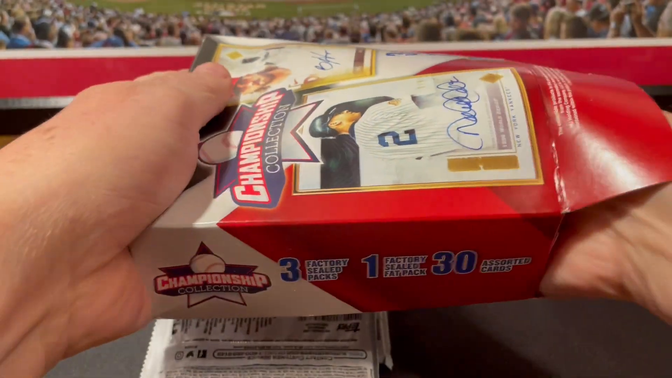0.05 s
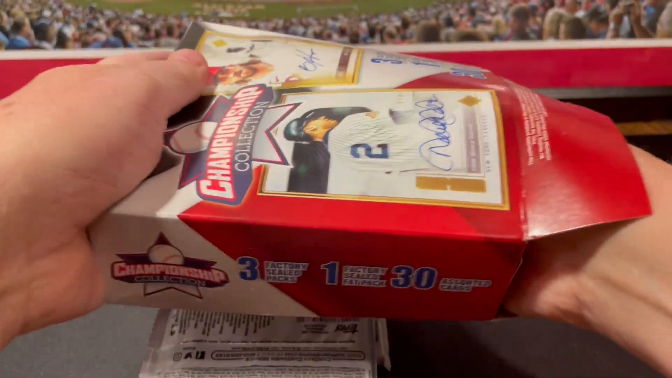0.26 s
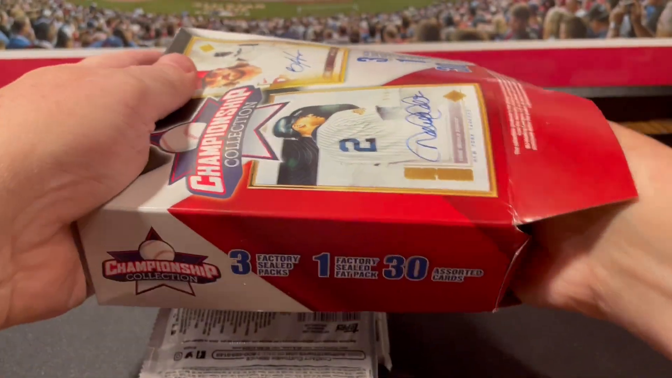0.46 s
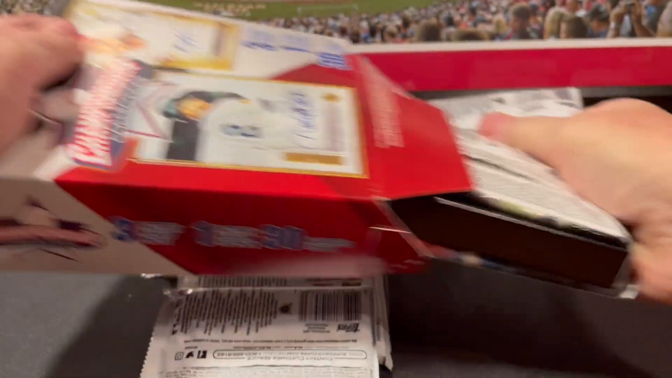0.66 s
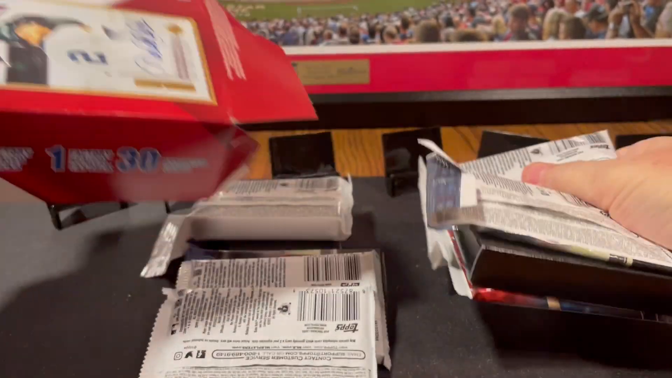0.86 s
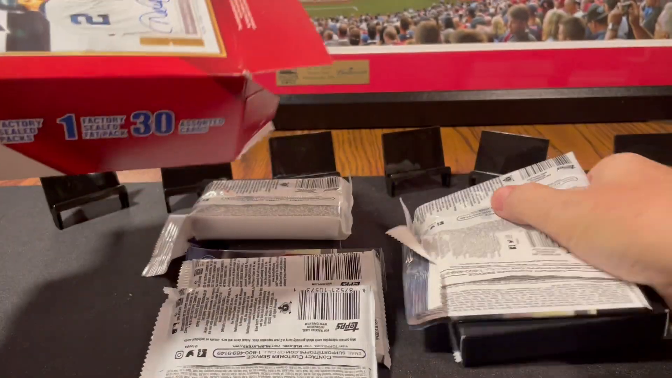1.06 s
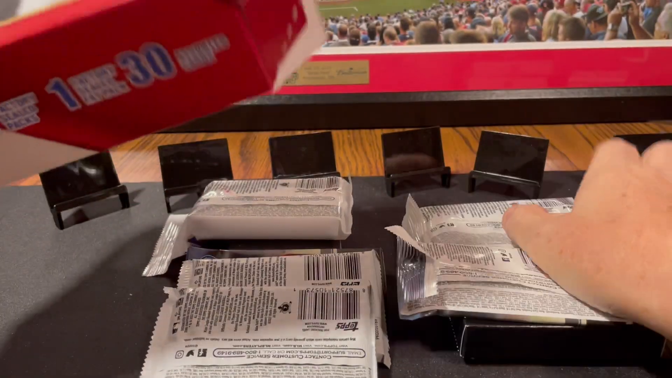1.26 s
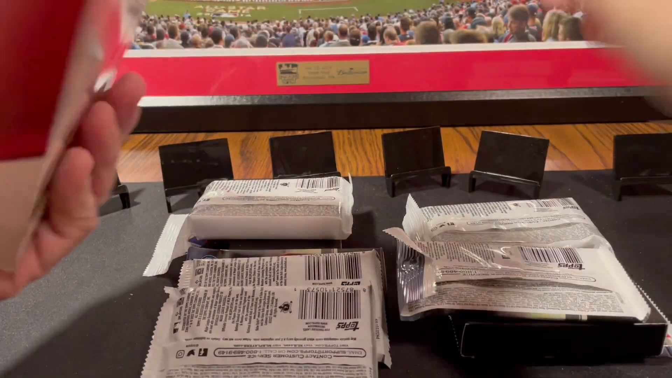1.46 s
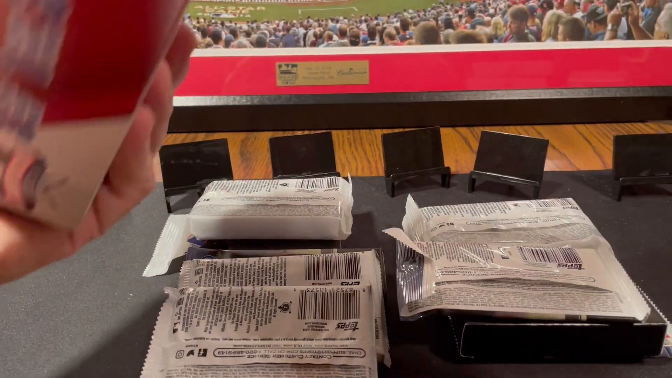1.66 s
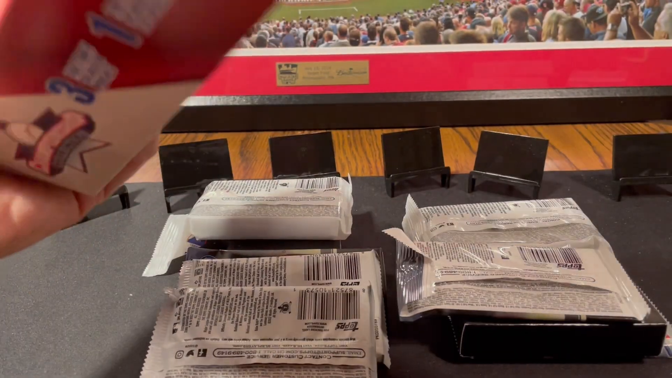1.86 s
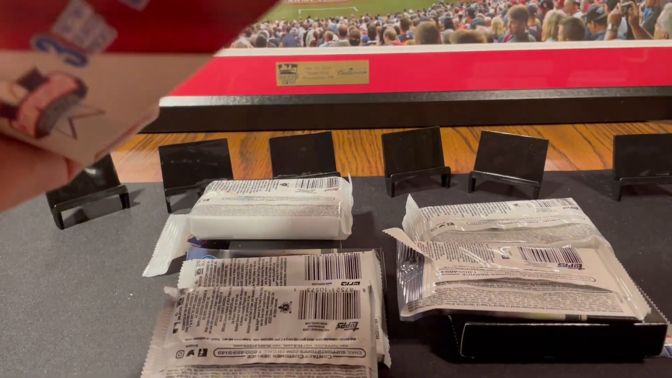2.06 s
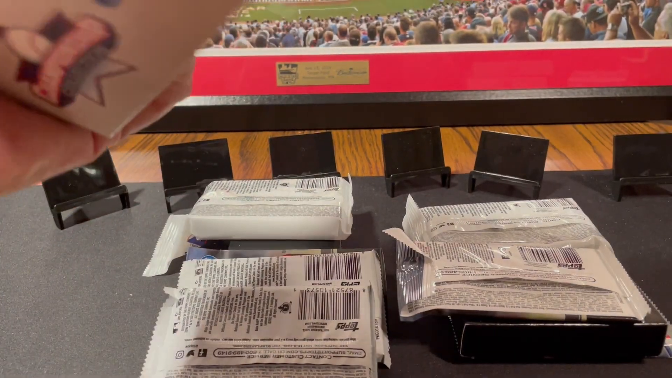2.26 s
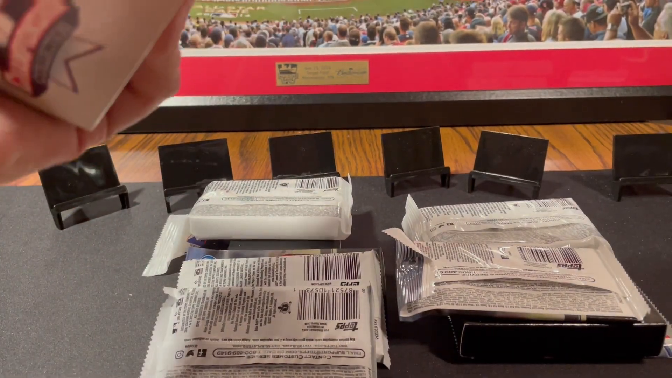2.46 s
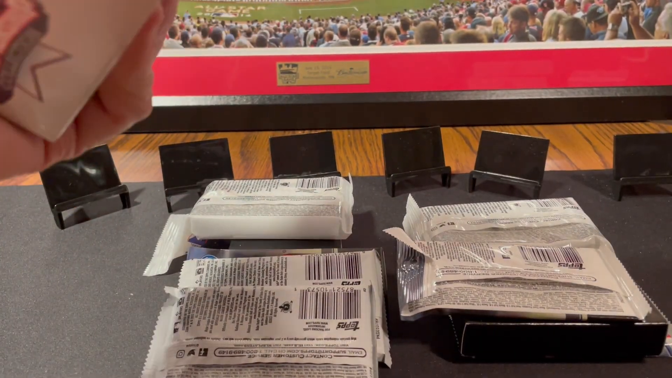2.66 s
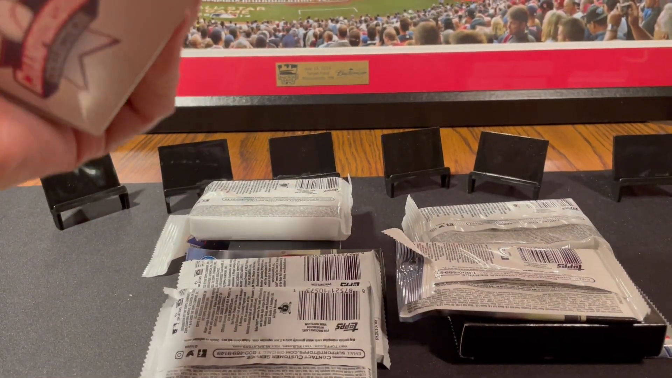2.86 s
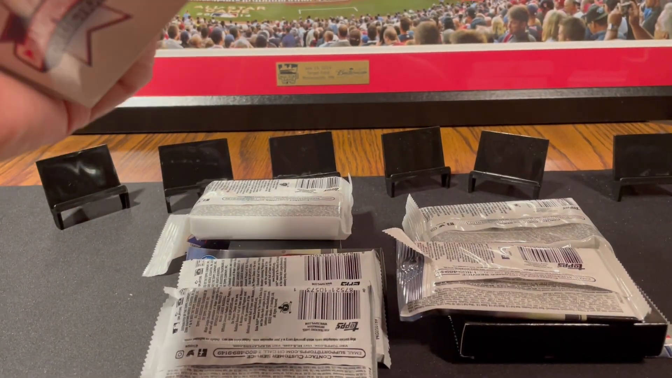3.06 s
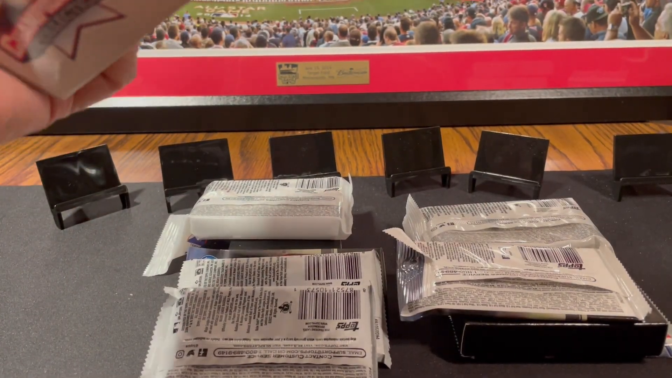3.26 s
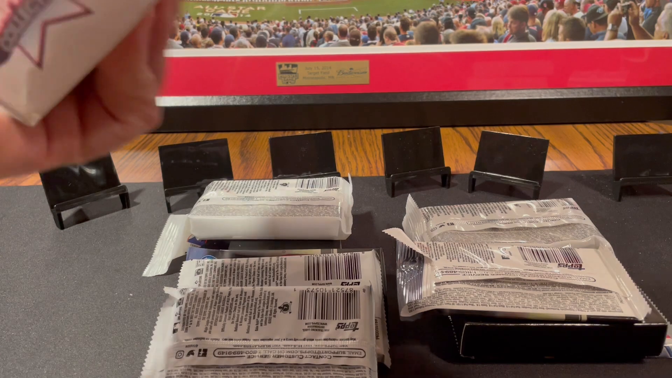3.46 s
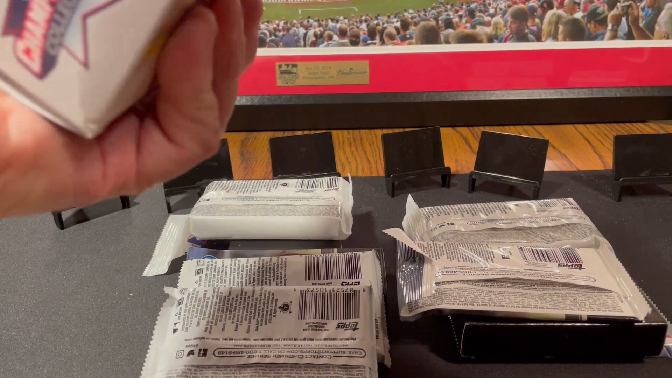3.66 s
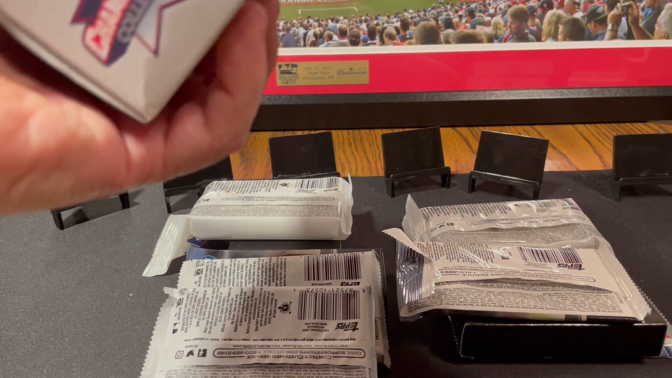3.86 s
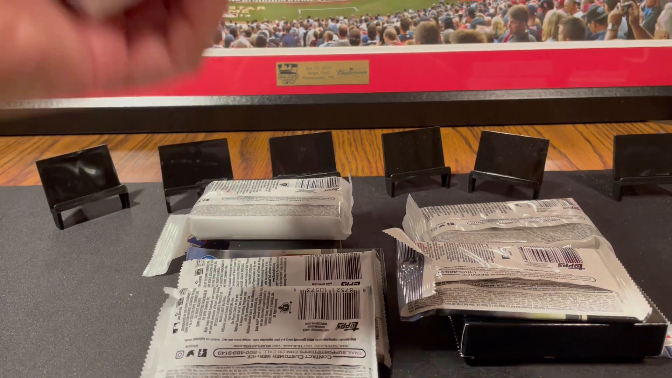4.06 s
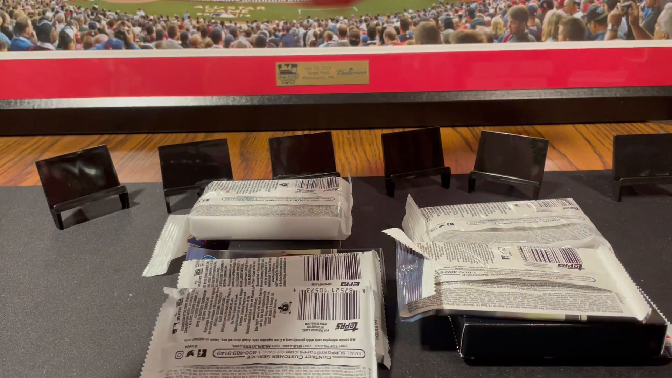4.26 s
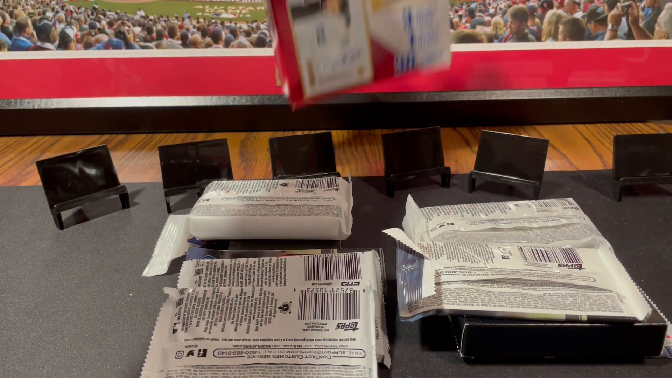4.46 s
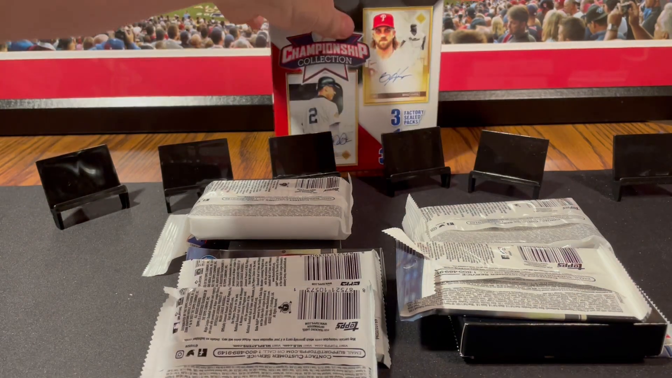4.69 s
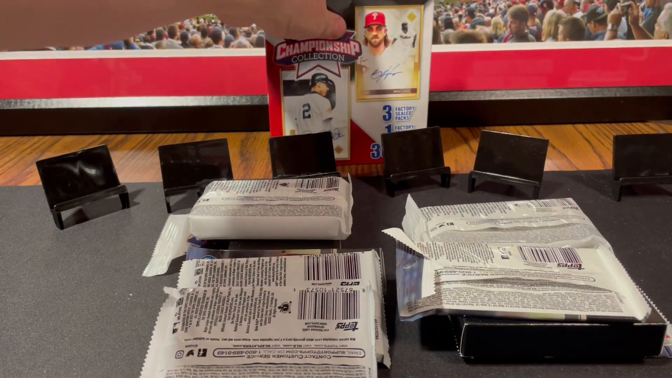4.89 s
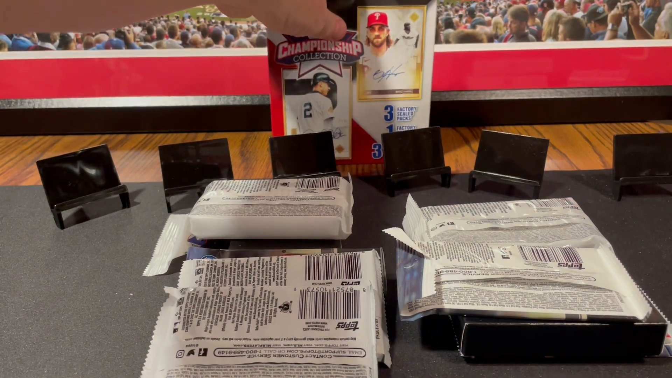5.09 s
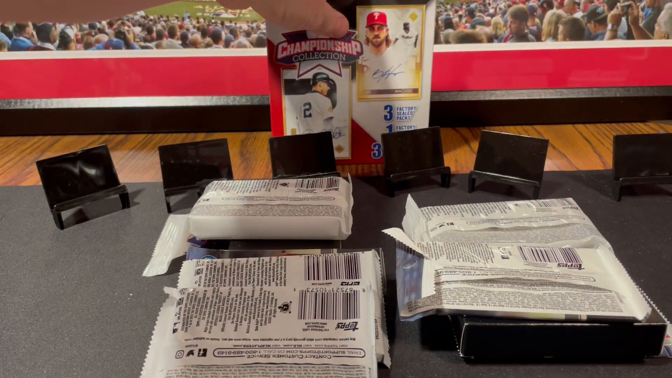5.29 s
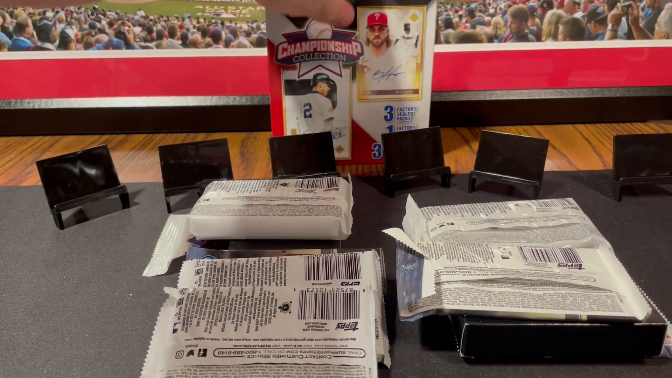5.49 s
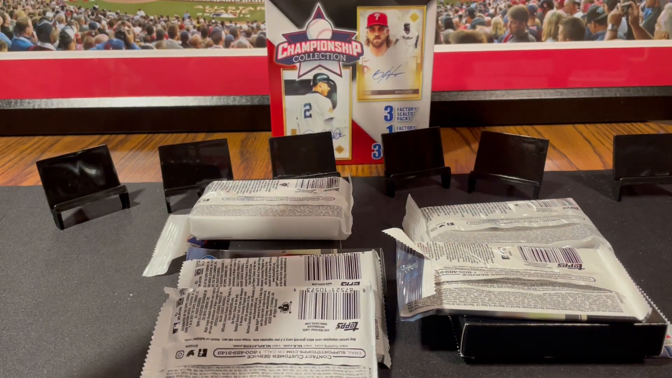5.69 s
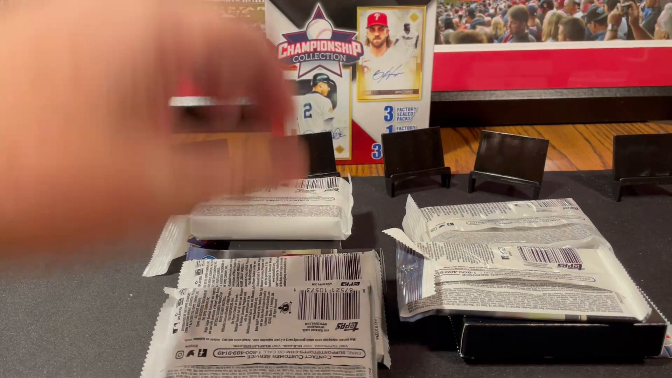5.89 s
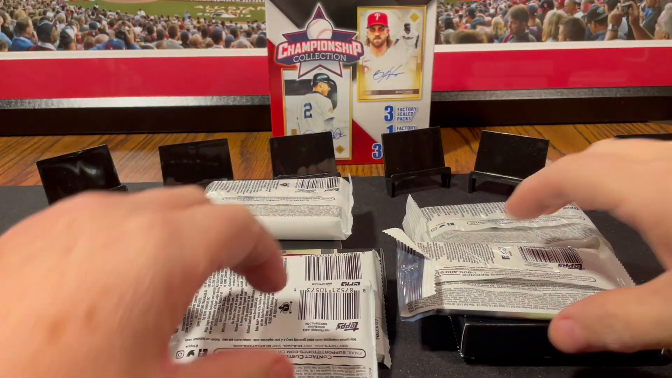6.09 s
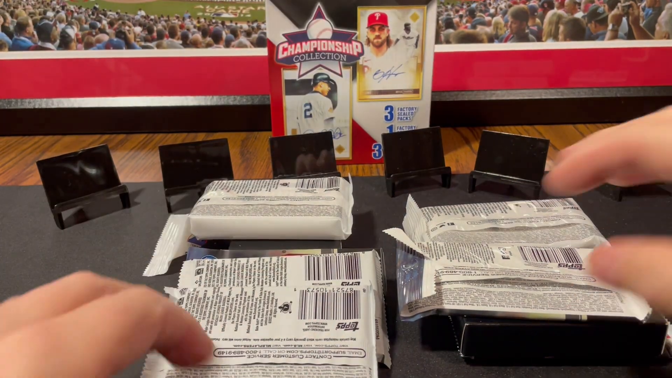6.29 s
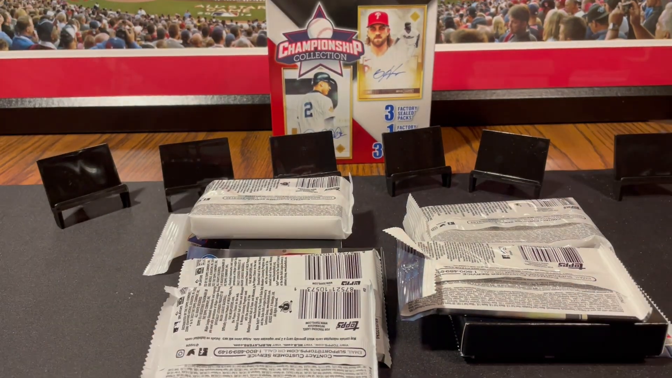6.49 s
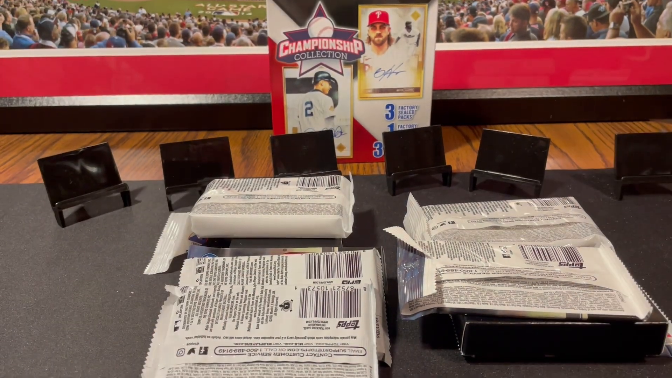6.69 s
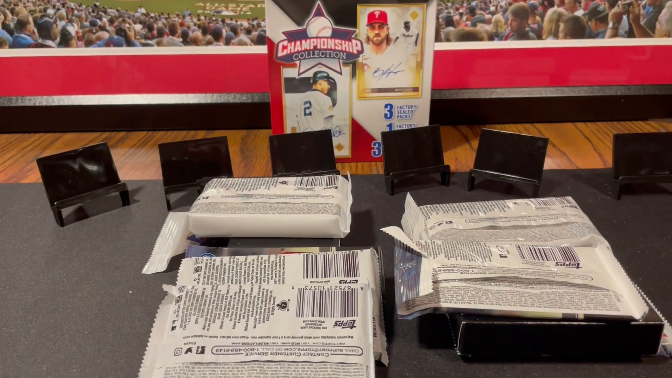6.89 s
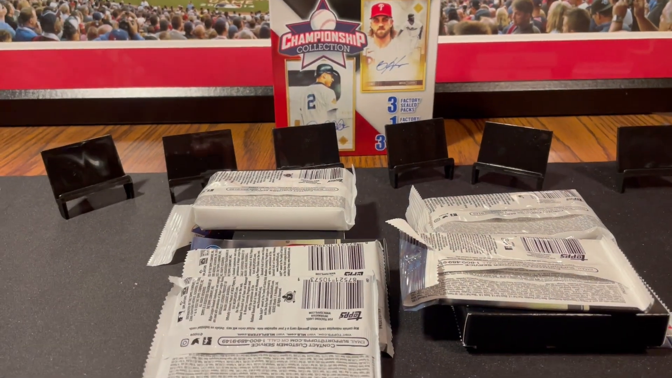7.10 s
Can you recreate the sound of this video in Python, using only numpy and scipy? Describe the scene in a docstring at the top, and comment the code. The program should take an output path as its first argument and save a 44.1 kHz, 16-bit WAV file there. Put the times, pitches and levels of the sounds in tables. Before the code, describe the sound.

Foil wrappers crackle and rustle as hands pull card packs from a scraping cardboard box and put them down with a low table thud. The box flaps are folded shut with sharp snaps, hollow knocks and scrapes. The box is stood up with one firm knock, and hands brush softly over a mat. A phone microphone picks it up close, in a small, quietly humming room.

```python
"""Foil crackles and snaps close by as hands pull card packs from a cardboard box and lay them down.
Creases flip with a tick, foil and card rustle in tiny slips, and the table top booms under the stack.
The box knocks and scrapes as it is folded shut and stood up; near the end, hands brush over the mat.
Heard through a phone with two microphone ports, close to the hands, in a small, quietly humming room."""
import sys
import numpy as np
from scipy import signal
from scipy.fft import rfft, irfft, next_fast_len
from scipy.io import wavfile
from scipy.ndimage import uniform_filter1d

SR = 44100
rng = np.random.default_rng(int(sys.argv[2]) if len(sys.argv) > 2 else 0)


def transcribe(u):
    """Save the signal u as a 16-bit wav file named by the first command-line argument.

    u: samples, shape (n,) or (channels, n), limited to [-1, 1]; the rate is SR.
    q: integer samples, one column per channel.
    """
    v = np.clip(np.atleast_2d(u).T, -1, 1)
    q = np.round(v * 32767).astype(np.int16)
    wavfile.write(sys.argv[1], SR, q)


N = 314861
T = np.arange(N) / SR
OPPOSED = np.array([[1], [-1]])  # plus on the left, minus on the right


def undb(db):
    return 10 ** (np.asarray(db) / 20)


def unit(x):
    return x / np.sqrt(np.mean(x ** 2))


def band(x, hz, width_hz):
    """Two-pole resonance, gain 1 at the centre."""
    return signal.lfilter(*signal.iirpeak(min(hz, .44 * SR), hz / width_hz, fs=SR), x)


def bandpass(x, lo_hz, hi_hz):
    return signal.sosfilt(signal.butter(3, [lo_hz, hi_hz], "band", fs=SR, output="sos"), x)


def ring(modes, push, colour_db):
    """A push sets each mode ringing, at its own level plus its share of colour_db."""
    return sum(undb(db + c) * band(push, hz, width) for (hz, width, db), c in zip(modes, colour_db))


def sides(pan_db):
    """Gains at the two ports, the left louder by pan_db."""
    return undb(OPPOSED * pan_db / 2)


def add(out, start_s, x, peak_db, pan_db):
    """Places a short sound with the given peak, then pans it."""
    i = int(start_s * SR)
    x = x[:N - i]
    out[:, i:i + len(x)] += undb(peak_db) * sides(pan_db) * x / np.max(np.abs(x))


def slips(per_s, spread_db, fade_s):
    """Envelope of tiny slips: chance moments, a few much larger than the rest, each fading fast."""
    hits = (rng.random(N) < per_s / SR) * undb(spread_db * np.minimum(rng.exponential(size=N), 4))
    return unit(signal.lfilter([1], [1, -np.exp(-1 / (fade_s * SR))], hits))


def wander(per_s):
    """Glides between random levels, per_s of them a second."""
    hold = int(SR / per_s)
    return 1.6 * uniform_filter1d(np.repeat(rng.standard_normal(N // hold + 1), hold), hold)[:N]


# The room's air, all around the phone. Each row: frequency in Hz, relative level in dB.
AIR_SPECTRUM = [(30, -1), (80, -3), (200, -8.5), (400, -19.5), (800, -21), (2000, -27), (4000, -35),
                (8000, -48), (10500, -91), (17000, -120)]
# Where the room tone gathers. Each row: centre in Hz, width in Hz, lift in dB.
DRONES = [(61, 83, 8.5), (170.6, 20, 6), (289, 77, 13), (486, 130, 11.5), (686, 17, 11), (990, 25, 10),
          (1110, 67, 6), (1475, 25, 13.5), (1993, 45, 14)]
# How alike the air is at the two ports. Each row: frequency in Hz, likeness from 0 to 1.
AIR_LIKENESS = [(60, 0.9), (130, 0.8), (290, 0.94), (640, 0.7), (1410, 0.6), (3100, 0.07), (6820, 0.07),
                (15000, 0)]


def room_tone(air_db=-49.5, mains_hz=118.2, mains_db=-55.5):
    """Quiet air with a few droning bands, alike at both ports in the bass, and a mains hum."""
    hz = np.maximum(np.arange(N // 2 + 1) * SR / N, 1)

    def curve(table):
        points_hz, values = np.transpose(table)
        return np.interp(np.log(hz), np.log(points_hz), values)

    lift_db = sum(db / (1 + (2 * (hz - centre) / width) ** 2) for centre, width, db in DRONES)
    colour, alike = undb(curve(AIR_SPECTRUM) + lift_db), curve(AIR_LIKENESS)
    mid, side = rfft(rng.standard_normal((2, N)))
    air = irfft(colour * (np.sqrt(1 + alike) * mid + np.sqrt(1 - alike) * side * OPPOSED), N)
    mains = np.sqrt(2) * undb(mains_db) * np.sin(2 * np.pi * mains_hz * T)
    return (unit(air) * undb(air_db) + mains) * sides(1.5)


# Hands on the mat, almost dead centre. Each row: centre in Hz, width in Hz, relative level in dB.
BRUSH_BANDS = [(1068, 400, 2), (1995, 350, 9), (3990, 1170, -7), (6090, 1800, -16), (10300, 3200, -30)]


def mat_brush(start_s=5.88, full_s=6.2, end_s=6.43, level_db=-61.5):
    """Hands brush over the mat: a smooth soft swish that swells, holds and thins out."""
    swell = np.clip((T - start_s) / (full_s - start_s), 0, 1)
    fade_db = (T > end_s) * (-2.5 - 20 * (T - end_s) / 1.4)
    swish = unit(ring(BRUSH_BANDS, rng.standard_normal(N), np.zeros(len(BRUSH_BANDS))))
    return swell * undb(level_db + fade_db) * swish * sides(0.97)


# The table top's modes. Each row: frequency in Hz, width in Hz, relative level in dB.
TABLE_MODES = [(64.4, 8.5, -17.5), (71, 5.1, 4.5), (95, 37, -5), (142, 27, -18.5), (210, 220, -9.5)]
# Thuds through the table, just left of centre. Each row: start in seconds, peak in dB, pitch in Hz.
TABLE_THUDS = [(1.171, -22.5, 190), (1.198, -12.5, 74), (1.2, -29, 150), (1.244, -31, 190), (2, -28.5, 113),
               (2.25, -22, 88.9), (2.412, -24, 116.3), (2.58, -26, 78.1), (2.714, -29, 78.1),
               (2.839, -14, 196), (2.879, -23, 100), (2.933, -25, 199), (3.06, -24, 170), (3.279, -17, 198),
               (3.382, -54, 99.6), (3.496, -33.5, 105), (3.591, -45, 96.9), (4.045, -52, 67.3),
               (4.595, -21.5, 75.4), (4.606, -18, 150), (4.623, -26, 111), (6.83, -42, 128),
               (7.011, -31.5, 80.7)]


def table_thuds(shove_cycles=0.065):
    """A blunt shove, a fraction of a cycle long, rings the table top's modes nearest its pitch."""
    out, t = np.zeros((2, N)), T[:10000]
    modes_hz = np.array(TABLE_MODES)[:, 0]
    for start, db, hz in TABLE_THUDS:
        shove = t * np.exp(-t * hz / shove_cycles)
        boom = ring(TABLE_MODES, shove, -8 * np.abs(np.log2(modes_hz / hz)))
        add(out, start, boom, db, pan_db=1.5)
    return out


# The stack coming to rest, a little to the left. Each row: time in seconds, rumble level in dB.
STACK_RUMBLE = [(0.99, -51), (1.03, -34.5), (1.09, -31.5), (1.166, -38.5), (1.189, -18)]


def stack_settling():
    """The weight of the packs settles on the table top, which rumbles in its low modes."""
    times, rumble_db = np.transpose(STACK_RUMBLE)
    contact = uniform_filter1d(1. * (T >= times[0]) * (T <= times[-1]), size=300)
    load = bandpass(rng.standard_normal(N), 42, 104)
    rumble = unit(ring(TABLE_MODES, load, colour_db=[-6.5, 20.0, -18.5, -24.5, -16.5]))
    return contact * undb(np.interp(T, times, rumble_db)) * rumble * sides(3.0)


# Where the hands work in front of the phone. Each row: time in seconds, left minus right in dB.
HAND_PATH = [(0, 2.5), (.7, 2), (.82, 0.5), (1.3, 2.5), (1.9, 5), (2.5, 5.5), (3, 4), (4.1, 3.5),
             (4.6, 2.5), (6.5, -0.5), (7.14, -1)]


def event_pans(events, scatter_db=1.2):
    """Left minus right dB of each event, scattered around where the hands are."""
    times = np.array(events)[:, 0]
    return np.interp(times, *np.transpose(HAND_PATH)) + scatter_db * rng.standard_normal(len(times))


# The cardboard panels' modes. Each row: frequency in Hz, width in Hz, relative level in dB.
BOX_PANELS = [(109, 36, -1.5), (149, 14, 0.5), (211.6, 49, -2.5), (295.3, 27, 10.5), (372, 97, 3.5),
              (470.3, 50, 2), (590, 90, -2), (796, 130, 1.5), (963, 76, 2), (1010, 48, -15.5),
              (1440, 59, -6.5), (1960, 110, -13.5), (2180, 390, -12)]
# Blows on the box, close to the phone. Each row: start in seconds, peak in dB, favoured pitch in Hz,
# fall-off of the panels away from that pitch in dB per octave.
BOX_KNOCKS = [(.039, -26, 1040, 8), (0.089, -25.5, 765, 24), (.19, -30, 312, 13), (0.44, -24, 980, 6),
              (.526, -13, 482, 42), (.531, -16.5, 318, 32), (.538, -21, 310, 22), (.552, -14.5, 450, 9.5),
              (.61, -25.5, 900, 3.5), (0.735, -26, 350, 4), (0.637, -17, 303, 16.5), (0.66, -12, 295, 7),
              (0.652, -11, 970, 7), (.672, -17.5, 450, 5), (0.693, -10, 317, 27), (0.821, -33, 490, 32),
              (.882, -34, 795, 8), (0.993, -21.5, 530, 12), (1.149, -29, 950, 7), (1.1, -33, 1075, 6),
              (1.3, -32, 312, -1), (1.391, -28, 293, 43), (1.996, -24.5, 820, 4), (2.125, -33.5, 296, 29),
              (2.209, -29, 950, 23), (2.228, -20.5, 980, 12), (2.26, -22, 205, -5), (2.385, -22, 280, -5),
              (2.414, -6, 900, 7.5), (2.418, -6.5, 473, 9), (2.429, -18, 200, -5), (2.477, -18, 960, 30),
              (2.497, -22, 930, 7), (2.544, -30, 830, 7), (2.556, -15, 393, -5), (2.575, -7.5, 850, 6.5),
              (2.679, -42, 1410, 20), (2.7, -19.5, 970, 1.5), (2.755, -32, 960, -3), (2.793, -24, 280, 15),
              (2.833, -17, 410, -2), (2.881, -20, 1030, 8), (2.922, -20, 376, 5), (3.047, -26.5, 780, 15),
              (3.066, -11.5, 204, 14), (3.126, -34, 750, 18), (3.162, -47, 780, 15), (3.235, -55, 950, 3),
              (3.265, -12, 1000, 8), (3.38, -19, 293, 0), (3.41, -23.5, 403, 15), (3.45, -29.5, 300, 4.5),
              (3.494, -14, 397, -2.5), (3.551, -30, 200, 0), (3.591, -24, 1100, 7), (3.597, -27.5, 300, 4),
              (3.697, -37.5, 204.6, 29), (3.704, -32.5, 1050, 2), (3.779, -31, 600, 45),
              (3.827, -39, 1100, 10), (3.848, -37.5, 280, -2), (4.038, -26, 334, 0),
              (4.044, -25.5, 1010, 11), (4.242, -28.5, 630, 8), (4.39, -42, 784, 29), (4.582, -9, 880, 6),
              (4.586, -10.5, 299, 3), (4.591, -10.5, 482, 22), (4.759, -34, 227, 28),
              (4.796, -32, 241.4, 5), (6.838, -29, 448, 4), (6.99, -33, 803, 21), (6.995, -30, 403, 15)]


def box_knocks(contact_s=0.0085, detune=0.025):
    """A clean tap and a rough push that dulls as it dies ring the box; each grip detunes the panels."""
    out, t = np.zeros((2, N)), T[:3600]
    modes_hz, pans = np.array(BOX_PANELS)[:, 0], event_pans(BOX_KNOCKS)
    noises = rng.standard_normal((len(BOX_KNOCKS), len(t)))
    grips = rng.standard_normal((len(BOX_KNOCKS), len(BOX_PANELS)))
    for (start, db, hz, falloff_db), pan_db, noise, grip in zip(BOX_KNOCKS, pans, noises, grips):
        tap = 1.1 * np.exp(-((t - .0012) * 4.84 * hz) ** 2)
        press = tap + noise * (1 - np.exp(-t / 0.0012)) * np.exp(-t / contact_s)
        dull = bandpass(press, 60, 1.22 * hz)
        sharp = 0.95 * bandpass(press * np.exp(-t / 0.0044), 1.21 * hz, 3 * hz)
        panels = [(f * (1 + detune * shift), width, level_db)
                  for (f, width, level_db), shift in zip(BOX_PANELS, grip)]
        knock = ring(panels, dull + sharp, -falloff_db * np.abs(np.log2(modes_hz / hz)))
        add(out, start, knock, db, pan_db)
    return out


# Foil, card and fingers sliding, close up. Each row: crest time in seconds, swell and fade in seconds
# per 20 dB, then the levels of rustle, treble and box scrape in dB.
HAND_STROKES = [(0.127, 0.1, 0.01, -33, -42, -34), (.29, 0.7, 0.048, -41, -59, -41.5),
                (.33, 0.0065, .008, -51, -47, -56), (0.379, 0.012, 0.93, -51.5, -54, -46),
                (.445, 0.012, 0.47, -40.5, -52, -37.5), (.588, 0.16, 0.068, -30, -41.5, -29),
                (.655, 0.058, 0.047, -37, -46.5, -28.5), (0.694, 0.094, 0.023, -26, -33, -27),
                (.735, 0.02, 0.026, -44, -48, -35), (.99, 0.1, .05, -68.5, -50, -57),
                (1.054, 0.05, 0.051, -34.5, -47, -44), (1.186, 0.15, 0.029, -30.5, -38, -38.5),
                (1.3, 0.34, 0.21, -60.5, -66.5, -61), (1.965, 0.0087, 0.18, -51, -64, -44),
                (1.995, 0.0098, 0.03, -40, -60, -29), (2.246, 0.11, 0.13, -47.5, -57, -37.5),
                (2.41, 0.078, 0.18, -46, -57.5, -39), (2.583, 0.09, 0.037, -35.5, -55, -25.5),
                (2.655, 0.052, 0.31, -52, -57, -44.5), (2.705, 0.044, 0.41, -48, -55.5, -38.5),
                (2.825, 0.12, 0.1, -45.5, -58, -29.5), (3.056, 0.028, 0.25, -51, -62, -44),
                (3.262, 0.084, 0.092, -46.5, -54, -36), (3.364, 0.013, 0.78, -43.5, -51.5, -36.5),
                (3.68, .2, .15, -53, -66, -59), (3.495, 0.26, 0.061, -45, -61.5, -38),
                (3.594, 0.036, 0.15, -46.5, -50, -48), (3.71, 0.0097, 0.05, -64, -70, -53),
                (3.829, 0.015, 1.8, -50.5, -55.5, -51), (3.935, 0.15, .02, -49.5, -47, -67),
                (4.4, 1, 0.63, -62.5, -71, -56), (4.585, 0.018, 0.052, -45.5, -69, -32.5),
                (4.821, 0.25, 0.24, -63, -89, -50), (5.856, 0.0092, 0.09, -55, -77, -50.5),
                (5.815, .03, 0.042, -65, -68, -78.5), (6.434, 0.014, 0.11, -51, -48.5, -57),
                (6.606, 0.034, 0.073, -51.5, -64, -48)]


def stroke_gains(release_s=4.06, release_db=-13.5):
    """Rustle, treble and scrape swell and fade with each stroke; overlapping strokes add in power."""
    power = np.zeros((3, N))
    # The hands let go of the flaps, and what was still sliding drops away.
    drop_db = release_db * np.clip((T - release_s) / 0.039, 0, 1)
    for crest, swell, fade, *levels_db in HAND_STROKES:
        shape_db = -20 * np.where(T < crest, (crest - T) / swell, (T - crest) / fade)
        shape_db += drop_db * (crest < release_s)
        power += (undb(levels_db)[:, None] * undb(shape_db)) ** 2
    return np.sqrt(power)


# The colour of foil rustling close up. Each row: band centre in Hz, relative level in dB.
FOIL_BANDS = [(1400, 0.5), (2200, -0.5), (3300, 0), (4800, 0.5), (6800, 0)]


def sliding(foil_down_s=1.6, width=0.2):
    """Foil rustles and card scrapes: dense slips over a smooth slide, the colour moving with the grip."""
    rustle_gain, treble_gain, scrape_gain = stroke_gains()
    slip_share = np.where(T < foil_down_s, 0.75, 0.4)  # crisp foil first, then smoother card
    shared_slips = slips(240, 3.6, 0.0031)

    def friction(own_slips):
        return rng.standard_normal(N) * (slip_share * (1.1 * shared_slips + 2.3 * own_slips)
                                         + 1 - slip_share)

    rustle = np.zeros(N)
    for hz, db in FOIL_BANDS:
        gain = undb(db + 3 * wander(22))
        rustle += gain * unit(band(friction(slips(170, 1.7, 0.0035)), hz, 0.4 * hz))
    treble = bandpass(friction(slips(430, 1.8, 0.0015)), 7500, 13800)
    drag = bandpass(friction(slips(120, 3, 0.006)), 57, 1900)
    panels_db = [4 * wander(14) - 0.5 * np.log2(hz / 500) for hz, _, _ in BOX_PANELS]
    scrape = ring(BOX_PANELS, drag, panels_db)
    hands = sides(np.interp(T, *np.transpose(HAND_PATH)))
    direct = (unit(rustle) * rustle_gain + unit(scrape) * scrape_gain) * hands
    direct += unit(treble) * treble_gain
    # A whole surface sounds, so a share of it differs between the ports.
    layers = (rustle, rustle_gain), (scrape, scrape_gain), (treble, treble_gain)
    spread = sum(np.roll(unit(x), 900) * gain for x, gain in layers)
    return direct + width * spread * OPPOSED


# Creases in foil and card, right by the phone. Each row: time in seconds, body peak in dB, centre in
# Hz, tick peak relative to the body in dB, time to fade 60 dB in milliseconds (held to 5 or more).
CREASE_SNAPS = [(0.0402, -22, 2200, -37, 22), (.047, -29, 3430, -1, 9.5), (.061, -38, 4970, 2, 5),
                (0.0652, -35, 5010, 8.5, 6), (0.0713, -35, 4990, 9.5, 6.6), (0.095, -14, 2830, -31, 15.6),
                (0.1157, -21, 1420, -4.5, 16), (0.1247, -25, 1880, -16, 14), (0.156, -40, 5000, 1, 7),
                (0.162, -22.5, 1320, -10, 22), (0.1752, -28, 2190, 6, 7.9), (0.1922, -26.5, 1220, -3, 17),
                (.1955, -34, 5500, 9, 6), (0.1996, -36, 6000, -1, 9), (0.23, -27, 2800, 7, 3.6),
                (.261, -27, 6000, 4, 8.1), (0.28, -24.5, 2460, -10, 17), (0.298, -33, 2400, -13, 6.8),
                (0.3262, -39, 4180, 13, 6.8), (0.333, -33, 3510, -1, 8.1), (0.374, -37, 1370, -14, 19),
                (0.392, -35, 2990, 2.5, 7.9), (0.403, -32.5, 3960, 4.5, 19), (.4195, -34.5, 4470, 0.5, 7.6),
                (0.4419, -10.5, 2480, 5, 4.7), (0.448, -23.5, 5530, -0.5, 7),
                (0.4569, -15, 3280, -2.5, 10.4), (0.5006, -27, 2910, -20.5, 18),
                (0.521, -21.5, 2430, -23.5, 35), (0.548, -9.5, 2060, -28, 18),
                (0.5533, -17, 6000, -11.5, 6.3), (0.5802, -8.5, 2530, -5, 6.5),
                (.589, -17.5, 3503, -10.5, 8.6), (0.653, -17, 2650, -18.5, 18), (0.666, -17, 3250, -15, 11),
                (.676, -16.5, 4000, -10.5, 33), (0.6887, -12, 5500, -1.5, 22),
                (0.7224, -26.5, 4970, -4, 7.6), (0.733, -21.5, 4870, 4.5, 5.2),
                (0.749, -25.5, 1822, -7.5, 14), (.768, -36.5, 4000, -10, 4.3),
                (.804, -42, 2030, -32.5, 9.4), (0.8211, -12, 5810, 1, 4.7), (0.882, -18, 6530, 9, 7.1),
                (0.8862, -30.5, 1940, -16, 6.3), (0.929, -17, 6200, 0.5, 3.1), (0.9447, -21, 6190, 5, 3),
                (.9495, -28, 5510, 5.5, 6), (0.9658, -18.5, 2005, 1.5, 11), (.9885, -27, 4990, -7.5, 4.3),
                (0.9903, -9, 3760, -9, 12.2), (1.0035, -27, 1850, -14, 7), (1.019, -24.5, 5500, 1.5, 6),
                (1.026, -21.5, 4450, -9.5, 9.9), (1.0299, -15, 5000, -4, 9.1),
                (1.045, -20.5, 6010, 1.5, 7.5), (1.056, -16, 4440, 6.5, 14.3), (1.083, -24, 5000, -5.5, 6),
                (1.0967, -10.5, 4410, -12, 9.64), (1.103, -15, 4520, -1, 8.2),
                (1.138, -20.5, 4130, -3.5, 12), (1.1485, -22, 4000, -5, 13), (1.158, -25.5, 2500, -5.5, 15),
                (1.182, -11.5, 1258, -40.5, 19), (1.2035, -36, 4030, 3, 7), (1.272, -41, 5000, 6, 8.3),
                (1.288, -37, 1340, -2, 23), (1.302, -29, 1260, -5, 30), (1.3158, -33, 5570, -2, 9),
                (1.384, -42, 1340, -7, 59), (1.478, -53.5, 2950, 0, 25), (1.7158, -34, 1310, -17, 9.3),
                (1.841, -44, 7240, 5, 14), (1.9964, -17.5, 1340, 0, 3.8), (2.2243, -37, 1610, -24, 27),
                (2.211, -42, 2280, -25, 18), (2.265, -39, 2500, -10, 15), (2.237, -29, 1540, -3.5, 21),
                (2.381, -29, 1507, -29, 30), (2.415, -4.5, 1573, -13.5, 17.5),
                (2.4768, -29.5, 2590, -14, 15), (2.4962, -25, 1292, -4, 28), (2.539, -32.5, 5190, -30, 59),
                (2.55, -29.5, 5215, -25.5, 33), (2.554, -28, 3045, -16.5, 25), (2.573, -12.5, 4780, -7, 19),
                (2.702, -29.5, 1390, -9, 23), (2.754, -40, 2210, -12, 12), (2.7917, -29.5, 1420, -6, 28),
                (2.826, -22.5, 1470, -11, 27), (2.837, -16, 1190, -23, 8.9), (2.8603, -36, 2200, -13, 14),
                (2.883, -32, 2270, -14, 67), (2.908, -28.5, 1430, -5, 37), (3.043, -40.5, 2230, -2, 82),
                (3.0649, -23, 1290, -10, 20.6), (3.082, -43, 2500, -20, 13), (3.1259, -47, 2500, -15, 12),
                (3.2417, -48, 2500, -11, 15), (3.2608, -30, 1720, -27, 32), (3.2644, -13, 2180, -8, 25),
                (3.36, -29, 1370, -32, 17), (3.3724, -20.5, 1290, -50, 34), (3.405, -30, 1506, -25.5, 24),
                (3.422, -26, 1396, -16.5, 17), (3.454, -31.5, 4480, -9.5, 18), (3.465, -45, 1500, -18, 12),
                (3.491, -12, 2580, -9.5, 13), (3.5395, -38, 2300, -15, 10), (3.554, -44, 1480, -15, 10),
                (3.59, -36.5, 1530, -12, 57), (3.704, -38, 1310, -30, 32), (3.8268, -40.5, 1200, -30, 33),
                (4.04, -31.5, 1300, -39, 50), (4.2437, -37.5, 1260, -35, 25), (4.482, -54, 3040, -17, 7.3),
                (4.582, -29, 1490, -27, 37), (4.8002, -43, 2970, -47, 10), (4.8278, -43.5, 2950, -37, 11),
                (5.856, -43.5, 1320, -28, 110), (6.433, -52, 2230, 20.5, 92), (6.602, -37.5, 1310, -38, 40),
                (6.838, -46, 1820, -42, 25)]


def crease_snaps(lead_samples=400):
    """A faint, quick swell leads into each snap: a burst coloured by facet size, and a bright tick."""
    out, lead_s = np.zeros((2, N)), T[lead_samples]
    t = T[:2400] - lead_s
    after = np.maximum(t, 0)
    lead_in = (t < 0) * undb(-24.5 + 3100 * t)
    pans = event_pans(CREASE_SNAPS)
    facet_ratios = rng.uniform(1.0, 3.6, len(CREASE_SNAPS))
    noises = rng.standard_normal((len(CREASE_SNAPS), 3, len(t)))
    for snap, pan_db, ratio, noise in zip(CREASE_SNAPS, pans, facet_ratios, noises):
        snap_s, db, hz, tick_db, fade_ms = snap
        start, t60 = snap_s - lead_s, max(fade_ms, 5) / 1000
        envelope = lead_in + (1 - np.exp(-after / (0.04 * t60))) ** 2 * undb(-60 * after / t60)
        body = band(band(noise[0] * envelope, hz, 0.37 * hz), hz, 3.4 * hz)
        burst = noise[1] * envelope
        neighbour = band(burst, ratio * hz, .3 * hz)  # a facet of chance size rings along
        crack = bandpass(burst + neighbour, 630, np.clip(8.1 * hz, 2000, 8600))
        tick = bandpass(noise[2] * envelope ** 2.3, 7500, 16400)
        add(out, start, body, db, pan_db)
        add(out, start, crack, db + 0.28 * tick_db - 1.5, pan_db)
        add(out, start, tick, db + tick_db, .3 * pan_db)
    return out


def near_walls(x, t60_s=0.057, level_db=-17):
    """Near walls answer with a short dull tail, different at each port."""
    t = T[:14000]
    tail = rng.standard_normal((2, len(t))) * undb(-60 * t / t60_s) * (t > .004)
    tail = bandpass(tail, 250, 4700)
    tail /= np.sqrt(np.sum(tail ** 2, axis=1, keepdims=True))
    return undb(level_db) * signal.fftconvolve(x.mean(axis=0, keepdims=True), tail, axes=1)[:, :N]


# The phone's two microphone ports. Each row: frequency in Hz, lead of the left port in radians.
PORT_PHASE = [(0, 0), (950, .2), (1640, .4), (5200, .4), (6630, -1), (7800, -2.9), (8800, -3.6),
              (10900, -6.2), (12300, -6.5), (14200, -9.3), (16400, -9.6)]


def microphone_ports(x):
    """The ports lie apart, so the treble reaches them out of step."""
    size = next_fast_len(N + 2000)
    lead = np.interp(np.arange(size // 2 + 1) * SR / size, *np.transpose(PORT_PHASE))
    return irfft(rfft(x, size) * np.exp(.5j * lead * OPPOSED), size)[:, :N]


def scene():
    """The work on the table reaches the phone directly and off the walls, over the room tone."""
    close = crease_snaps() + box_knocks() + table_thuds() + sliding() + stack_settling() + mat_brush()
    return microphone_ports(close) + near_walls(close) + room_tone()


def record(dry):
    """The phone drops the deepest bass, rounds the loudest peaks and cuts the top."""
    low_cut = signal.butter(4, 48, "high", fs=SR, output="sos")
    high_cut = signal.cheby1(14, .2, 16200, fs=SR, output="sos")
    rounded = np.tanh(signal.sosfilt(low_cut, dry))
    return signal.sosfilt(high_cut, rounded)


dry = scene()
out = record(dry)
transcribe(out)
```